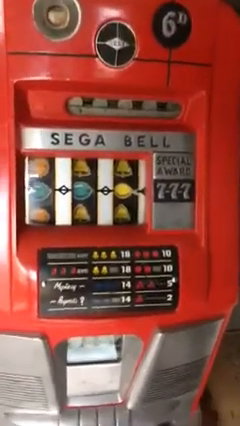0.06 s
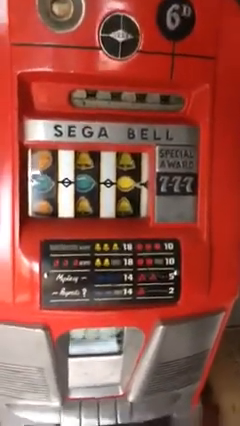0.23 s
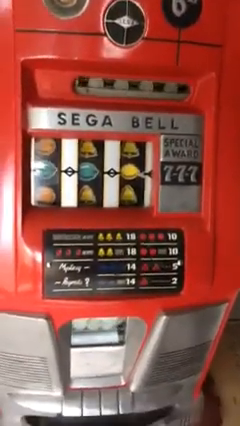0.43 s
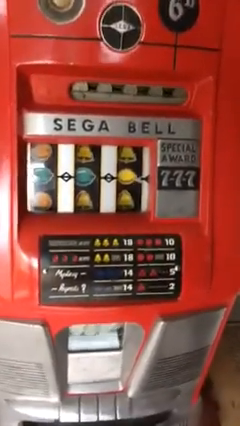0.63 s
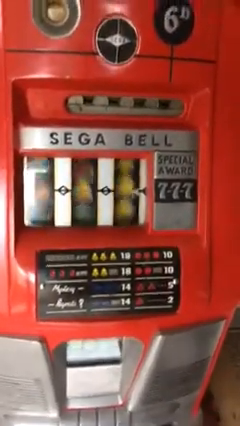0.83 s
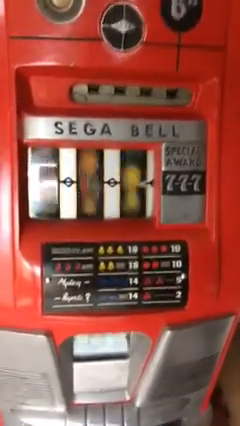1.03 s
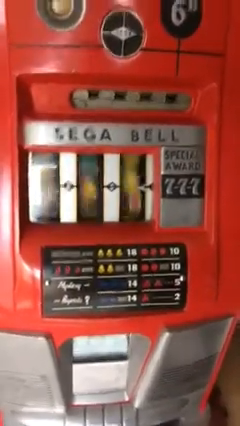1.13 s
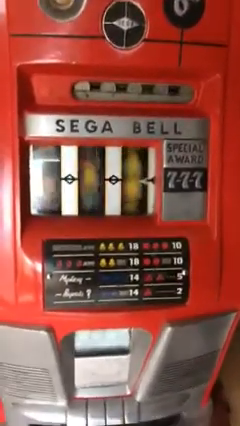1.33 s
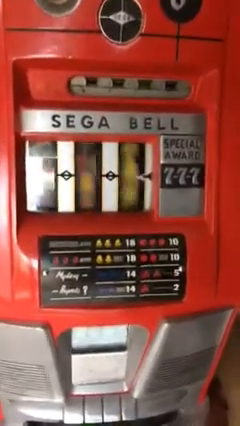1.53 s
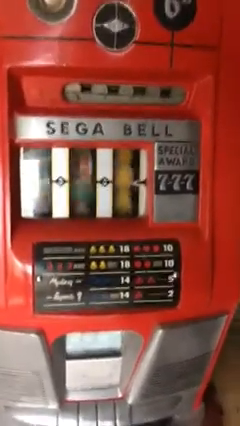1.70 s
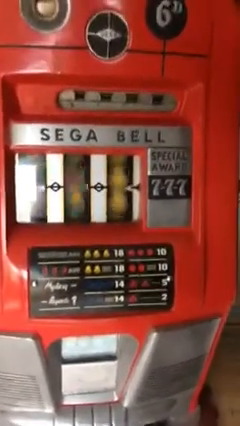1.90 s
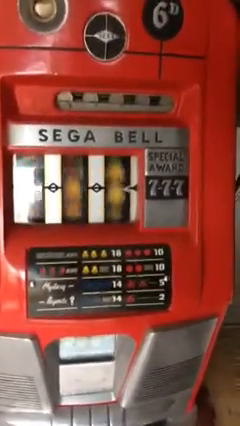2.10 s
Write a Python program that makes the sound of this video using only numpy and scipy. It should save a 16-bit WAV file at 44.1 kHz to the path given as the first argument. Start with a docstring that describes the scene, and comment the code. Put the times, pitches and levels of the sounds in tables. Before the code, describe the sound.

Close up in a quiet small room, a slot machine lever grinds and ratchets, latches bang in a hollow metal cabinet as the reels are kicked off, separate clacks follow, then soft ticks and a thin rising whine.

```python
"""A mechanical slot machine in a quiet room, whose air is a faint shaped noise throughout.
The lever is pulled and the works grind and clack: bursts of tiny metal contacts, with ringing parts.
The hollow cabinet booms: low pushes excite its resonances, and two long low tones swell and beat.
The reels are kicked off and spin while latches drop; late on they give a thin rising whine.
A short echo of the room follows the clatter and whine, and more weakly the rings."""
import sys
import numpy as np
from scipy import signal
from scipy.fft import rfft, irfft
from scipy.io import wavfile

SR = 44100
rng = np.random.default_rng(int(sys.argv[2]) if len(sys.argv) > 2 else 0)


def master(y):
    """Save y as 16-bit WAV."""
    cut = np.clip(np.atleast_2d(y).T, -1, 1)
    pcm = np.round(cut * 32767)  # scale
    wavfile.write(sys.argv[1], SR, pcm.astype(np.int16))


N = 94815  # length in samples


def from_db(db):
    """Turn decibels into a factor that multiplies the wave."""
    return 10 ** (np.asarray(db) / 20)


def rms_one(x):
    """Scale a sound to an average (rms) strength of one."""
    return x / np.sqrt(np.mean(x ** 2) + 1e-20)


def in_time(rows):
    """Draw straight lines between the rows of a table, giving each column a value at every sample."""
    s, *columns = np.transpose(rows)
    return [np.interp(np.arange(N) / SR, s, c) for c in columns]


def at_hz(points, hz):
    """Read a table between its rows, with pitch spaced as the ear hears it (logarithmic)."""
    table_hz, values = np.array(points).T
    return np.interp(np.log(hz), np.log(table_hz), values)


def band(x, low_hz, high_hz):
    """Keep mainly what lies between two frequencies."""
    edges = [low_hz, min(high_hz, .45 * SR)]
    return signal.sosfilt(signal.butter(2, edges, "band", fs=SR, output="sos"), x)


def modes(x, table):
    """Let x excite several fading resonances; noise of unit rms brings each to its own level."""
    out = 0
    for hz, db, t60 in table:
        r = from_db(-60 / (max(t60, .005) * SR))  # what is left after one sample
        w = 2 * np.pi * hz / SR
        ring = signal.lfilter([0, np.sin(w)], [1, -2 * r * np.cos(w), r * r], x)
        out = out + from_db(db) * np.sqrt(1 - r * r) * ring
    return out


def waver(depth_db):
    """Make a gain that drifts up and down at random, a few to some tens of times a second."""
    return from_db(depth_db * rms_one(band(rng.standard_normal(N), 3.3, 26)))


def grains():
    """Rubbing metal: thousands of tiny contacts of uneven size that come in clumps, at unit rms."""
    grains_per_s, spread_db = 5000, 3
    clump_db, clumps_per_s = 1.5, 43.4  # the second is the fastest clumping
    sizes = from_db(spread_db * np.minimum(rng.exponential(1, N), 5)) * rng.choice([-1, 1], N)
    clumps = rms_one(band(rng.standard_normal(N), clumps_per_s / 4, clumps_per_s))
    contacts = rng.random(N) < grains_per_s / SR
    return rms_one(sizes * from_db(clump_db * clumps) * contacts)


def air():
    """The quiet of the room: steady random noise, made louder or softer at each frequency."""
    # colour of the noise before it is scaled as a whole: f/Hz, level/dB per Hz
    air_colour = [(15, -23), (25, 3), (140, -9.5), (552, 7), (919, 6.5), (2490, -5), (2920, -12),
                  (11500, -14), (15500, -35)]
    air_db = -67
    hz = np.maximum(np.arange(N // 2 + 1) * SR / N, 10)
    noise = irfft(rfft(rng.standard_normal(N)) * from_db(at_hz(air_colour, hz)), N)
    return from_db(air_db) * rms_one(noise)


def hum():
    """The cabinet's two long low rings as swelling sines, with a shudder and a rumble beside them."""
    # swells of the two rings: t/s, lower level/dB, upper level/dB
    hum_swells = [(0,-69,-106), (.165,-76,-57.5), (.185,-40.5,-34), (.24,-36,-91), (.29,-60,-66),
                  (.36,-40,-35), (.42,-45.5,-65), (.58,-70,-59), (.63,-48,-60), (.72,-47.5,-54),
                  (.82,-47,-48.5), (.87,-33,-31.5), (1.01,-30.5,-36), (1.07,-42,-73), (1.14,-43.5,-41),
                  (1.35,-45,-53.5), (1.38,-39.5,-47.5), (1.46,-44.5,-53), (1.53,-28.5,-47.5),
                  (1.575,-43,-50), (1.61,-35,-43), (1.72,-54,-57.5), (1.78,-46,-55), (2.12,-56.5,-56.5),
                  (2.15,-52,-33.5)]
    # pitch of the lower and the upper ring: f/Hz
    hum_pitches = (104.5, 159.4)
    shudder_db, murmur_db = -16, -10.5  # relative to the lower and the upper ring
    t = np.arange(N) / SR
    levels = from_db(in_time(hum_swells))
    shudder = from_db(shudder_db) * levels[0] * rms_one(band(rng.standard_normal(N), 22, 55))
    murmur = from_db(murmur_db) * levels[1] * rms_one(band(grains(), 190, 420))
    out = shudder + murmur
    for hz, level in zip(hum_pitches, levels):
        sine = np.sin(2 * np.pi * (hz * t + rng.random()))  # starts anywhere in its cycle
        out = out + np.sqrt(2) * level * waver(1.8) * sine
    return out


def force():
    """Clacks and grinding set how hard parts touch in four registers; clacks also push, click and ring."""
    # clacks of the works, before the trims and shortest times below: t/s, peak level/dB, then
    # relative to the peak boom/dB, knock/dB, sizzle/dB, then rise/s, time to fall by 60 dB/s,
    # ring of the struck part f/Hz, ring level relative to the peak/dB
    clacks = [(0.016,-50,0,-2,-26,0.0033,0.038,350,-2), (0.061,-35,-14.5,-3.5,-35,0.0053,0.04,1790,-11),
              (0.174,-27.5,-14,-5,-13,0.0036,0.1,376,-8), (0.218,-22.5,-42,-13,-5,0.0022,0.031,1875,-5.5),
              (.23,-28.5,-7,-2,-11,0.0021,0.1,6900,-9), (0.311,-29,-10.5,-40,-28,0.011,0.32,2480,-1),
              (0.325,-14.5,-24,-10.5,-22,.0026,0.081,2360,-34), (0.347,-29,-2,1,-9,0.0023,0.2,250,4),
              (0.363,-13.5,-11,-11.5,-19,0.0013,0.086,1710,-12),
              (0.412,-21,-22,-16,-20,.002,0.15,936,-13.5), (0.441,-25.5,-19,-17,-16,0.0022,0.052,1790,-16),
              (0.474,-26.5,-21,-27,-5,0.0047,0.11,2840,-12.5), (0.496,-35,-32,-1,2,0.0031,0.16,590,-4),
              (0.531,-18,-36,-39.5,-20,0.0022,0.21,3100,-24.5),
              (.567,-13.5,-43,-7,-23.5,0.0035,0.11,3250,-17), (.601,-7,-14,-7.5,-6.5,0.0049,0.093,547,-7.5),
              (0.653,-28,-21,-28.5,-8,0.0021,0.081,2300,-24),
              (0.687,-20.5,-32,-10.5,-6.5,.001,0.15,2450,-10),
              (0.73,-17.5,-24.5,-14,-11,0.0034,0.036,1140,-22.5),
              (0.791,-24,-13,-19.5,-9.5,0.0026,0.19,1700,-26),
              (.836,-18,-13,-7.5,-31,0.0093,0.078,1140,-20), (.855,-11,-11.5,-6.5,-7,0.0019,0.32,420,-4),
              (0.885,-14.5,-20,-11,-12,0.002,0.11,401,-16), (0.916,-4.5,-15.5,-11,-28,.005,0.057,526,-6.5),
              (0.948,-19,-0.5,4.5,1,0.0035,0.12,545,-5.5), (.966,-15,1.5,-11.5,-3.5,0.0024,0.18,9040,-13),
              (0.978,-17.5,-22,-3,-11,.0034,0.053,408,2.5), (1.014,-20,-13.5,-1.5,-22,.005,0.073,376,-2),
              (1.116,-26,-13,-3,-15,.001,0.11,1770,-4), (1.224,-46,16,7.5,-34.5,0.004,0.021,874,-12),
              (1.357,-24,-9,-12.5,-12.5,.003,0.5,536,0.5), (1.366,-1,-28,-12,-13,.0017,0.075,10200,-19),
              (1.443,-17.5,-18.5,-12.5,-23,0.00054,0.16,6470,-14.5),
              (1.482,-2,-23,-16,-9.5,.005,0.055,1795,-9), (1.497,-14,-13,-9,-13.5,0.0026,0.11,955,-8),
              (1.573,-19,-7.5,-5.5,-26.5,.001,0.11,950,-1), (1.711,-51,21.5,-16,-20,0.0018,0.062,922,4),
              (1.871,-55.5,13.5,-2,-28,0.0062,0.11,412,5.5),
              (2.022,-61.5,19.5,1,-19.5,0.0056,0.18,430,13.5),
              (2.135,-21.5,-3,-13,-35,0.0063,0.18,1147,-6.5)]
    # grinding of gears and whirr of reels: t/s, level/dB, sizzle relative to it/dB
    grind = [(0,-80,-10), (.16,-81,-16), (.2,-37.5,-9), (.3,-76,-9), (.34,-41,-7), (.45,-40,-16),
             (.62,-39,1), (.74,-38.5,-9), (.81,-54.5,7.5), (.92,-32.5,6), (1.05,-46.5,-11),
             (1.2,-60.5,-11.5), (1.35,-52,-28.5), (1.5,-42.5,6), (1.68,-71.5,-4.5), (2.15,-66,-17)]
    boom_trim_db, knock_trim_db, snap_db, sizzle_trim_db = 3, -1, -6.5, -0.5
    rumble_db = -5.5  # grinding in the boom register, relative to its level
    crack_db, crack_t60 = -5, 0.051  # dB, s: extra sharpness around the top of each clack
    click_db = 0  # first touch, relative to the peak
    part_cycles = 260  # a struck part rings for so many cycles, within limits

    power, rings, pushes = np.zeros((4, N)), np.zeros(N), np.zeros((2, N))
    t = np.arange(SR // 3) / SR
    noise = rng.standard_normal(N + len(t))
    for s, db, boom_db, knock_db, sizzle_db, rise, t60, hz, ring_db in clacks:
        rise = max(rise, .0003)
        shape = np.minimum(t / rise, 1) * from_db(-60 * np.maximum(t - rise, 0) / max(t60, .01))
        sharp = from_db(crack_db - 60 * np.abs(t - rise) / max(crack_t60, .003))
        crack = shape * (1 + sharp) / 2
        shapes = np.array([shape, shape, crack, crack])
        gains = from_db(db + np.array([boom_db + boom_trim_db, knock_db + knock_trim_db,
                                       snap_db, sizzle_db + sizzle_trim_db]))
        i = int((s - rise / 2) * SR)
        power[:, i:i + len(t)] += (gains[:, None] * shapes[:, :N - i]) ** 2

        ring_t60 = np.clip(part_cycles / hz, .02, .045)
        ring = modes(shape ** 4 * noise[i:i + len(t)], [(hz, 0, ring_t60)])
        ring = ring / np.abs(ring).max()
        rings[i:i + len(t)] += from_db(db + ring_db) * ring[:N - i]
        # one-sample blows, up or down at random
        pushes[:, int(s * SR)] = np.array([gains[0], from_db(db + click_db)]) * np.sign(noise[i])
    db, treble_db = in_time(grind)
    power += from_db([db + rumble_db, db, db, db + treble_db]) ** 2
    return np.sqrt(power), pushes, rings


def teeth(strength):
    """Levers and gear teeth: scattered ticks each set a small metal part ringing."""
    # rings of levers and gear teeth: f/Hz
    teeth_pitches = [2250, 2795, 3116, 3935, 5286, 5540, 6600, 7170, 7680, 9300, 10250, 12300, 14200]
    cycles, level_db, ticks_per_s = 200, -5, 120  # the last for each pitch
    out = 0
    for hz in teeth_pitches:
        ticks = rng.standard_normal(N) * (rng.random(N) < ticks_per_s / SR)
        out = out + modes(rms_one(ticks) * strength + 1e-18, [(hz, level_db, cycles / hz)])
    return out / np.sqrt(len(teeth_pitches))


def works():
    """Contacts from dull to bright drive the cabinet and the frame; returns the clatter and the rings."""
    # short booms of the cabinet, before its overall gain: f/Hz, level/dB, time to fall by 60 dB/s
    cabinet = [(132.3, 3, 0.095), (222.7, -2, 0.095)]
    # rings of frame and panels, before their overall gain: f/Hz, level/dB, time to fall by 60 dB/s
    frame = [(374, -14, 0.31), (419.7, 1, 0.12), (537.3, 2.5, 0.049), (927, -1.5, 0.1), (1214, -11, 0.048),
             (1870, -2.5, 0.12), (2630, -4, 0.0074), (4310, -13.5, .05)]
    cabinet_db, frame_db, thump_db = -23.5, -22, 34.5
    (boom, knock, snap, sizzle), (pushes, clicks), part_rings = force()
    metal = rms_one(band(grains(), 400, 1555)) * knock
    metal = metal + rms_one(band(grains(), 1190, 4640)) * snap
    metal = metal + rms_one(band(grains(), 5500, 17000)) * sizzle
    metal = metal + band(clicks + 1e-18, 900, 9000)

    rumble = 0.42 * rms_one(band(rng.standard_normal(N), 90, 330)) * boom
    push = rumble + from_db(thump_db) * band(pushes + 1e-18, 80, 300)
    clatter = 0.6 * metal + 0.78 * band(push, 90.6, 480) + from_db(cabinet_db) * modes(push, cabinet)
    rings = from_db(frame_db) * modes(metal, frame) + part_rings + teeth(np.sqrt(snap * sizzle))
    return clatter, rings


def whine():
    """The spinning reels' thin rising tone, with an unsteady second tone at an uneven multiple of it."""
    # pitch and level of the whine: t/s, f/Hz, level/dB
    whine_course = [(1.75, 790, -85.5), (1.9, 810, -66), (1.97, 830, -64), (2.03, 845, -82),
                    (2.1, 870, -67)]
    # added tones: multiple of the pitch, level relative to the main tone/dB
    whine_partials = [(1.41, -7.5)]
    hz, db = in_time(whine_course)
    turns = 2 * np.pi * np.cumsum(hz) / SR
    tone = np.sin(turns)
    for multiple, partial_db in whine_partials:
        tone = tone + from_db(partial_db) * waver(3.4) * np.sin(multiple * turns)
    return np.sqrt(2) * from_db(db) * tone


def room(x):
    """Echo of the room: a smear of fading noise, in bands that each die away at their own speed."""
    # how long the echo lasts: f/Hz, time to fall by 60 dB/s
    room_t60 = [(100, 0.29), (500, 0.5), (2000, 0.36), (6000, 0.27), (14000, 0.07)]
    build_up = 0.012  # s
    t = np.arange(SR) / SR
    edges = 40 * 2 ** np.arange(0, 9.1)  # Hz, an octave apart
    tail = 0
    for low, high in zip(edges, edges[1:]):
        fade = from_db(-60 * t / at_hz(room_t60, np.sqrt(low * high)))
        tail = tail + band(rng.standard_normal(SR), low, high) * fade
    tail = tail * np.minimum(t / build_up, 1)
    return signal.fftconvolve(x, tail / np.sqrt(np.sum(tail ** 2)))[:N]


def scene():
    """Add up the machine, its echo and the room's quiet."""
    room_db, ring_share = -12, 0.18  # echo level; how much of the rings enters the echo
    clatter, rings = works()
    clatter = band(clatter, 69, 20000) + whine()
    echo = from_db(room_db) * room(clatter + ring_share * rings)
    return (clatter + rings + echo + hum() + air())[None]


def record(dry):
    """Cut the very top: from 15950 Hz up, all is at least 60 dB weaker."""
    return signal.sosfilt(signal.cheby2(20, 60, 15950, fs=SR, output="sos"), dry)


dry = scene()
out = record(dry)
master(out)
```